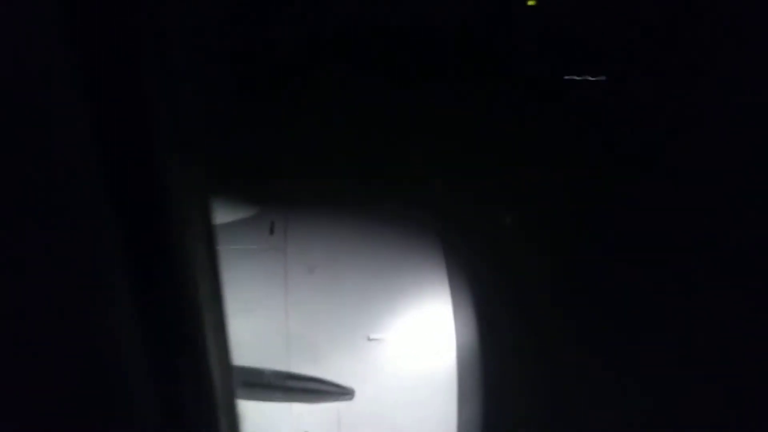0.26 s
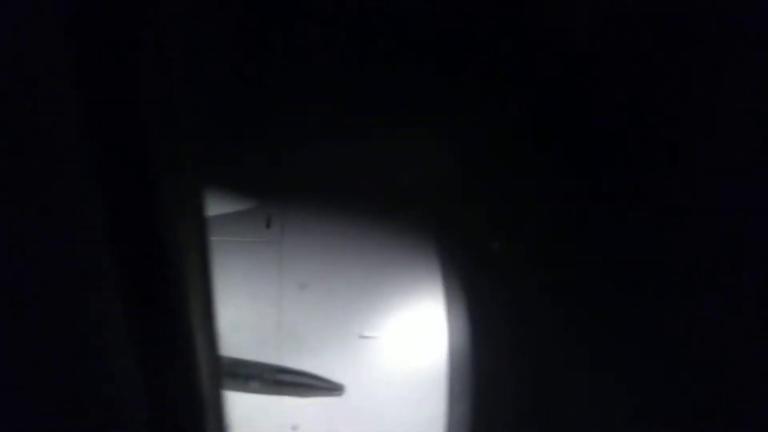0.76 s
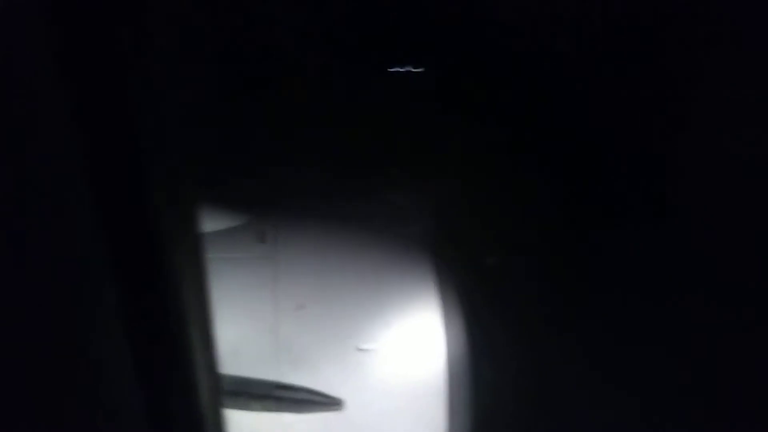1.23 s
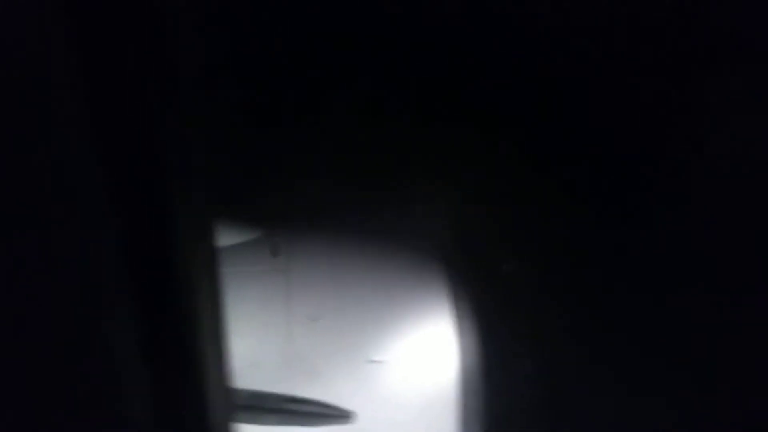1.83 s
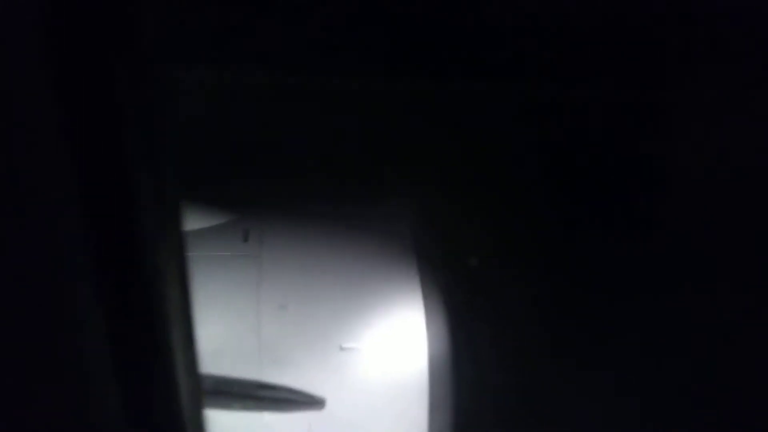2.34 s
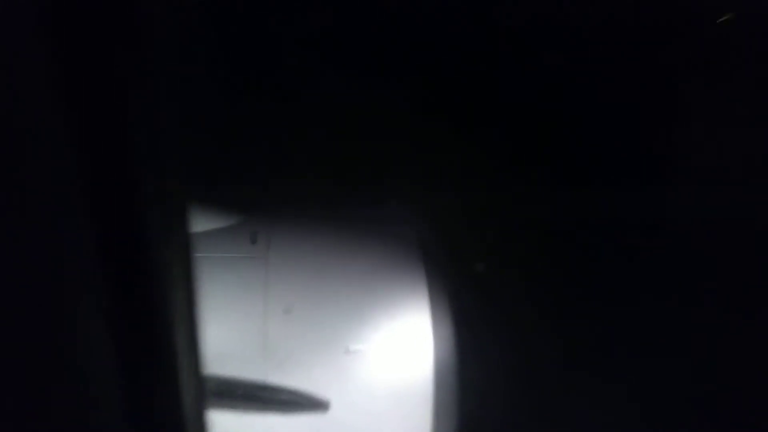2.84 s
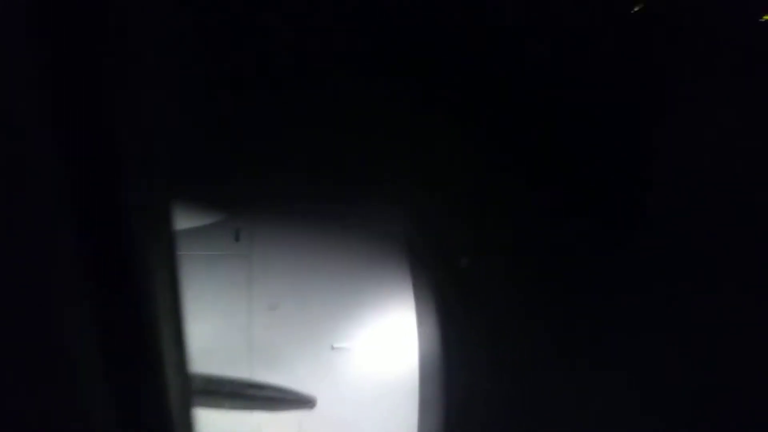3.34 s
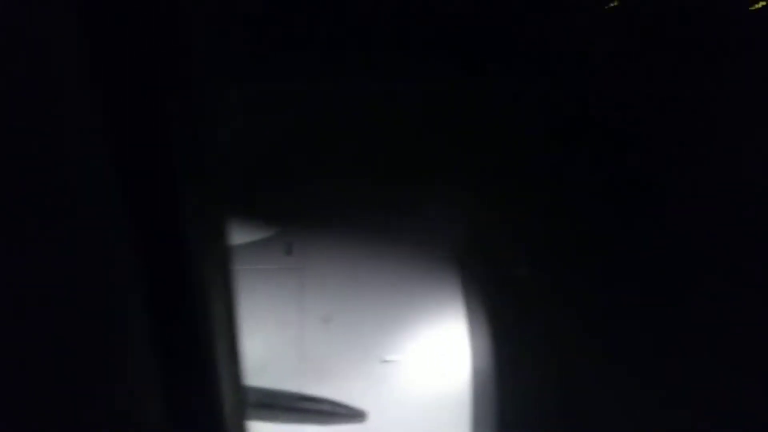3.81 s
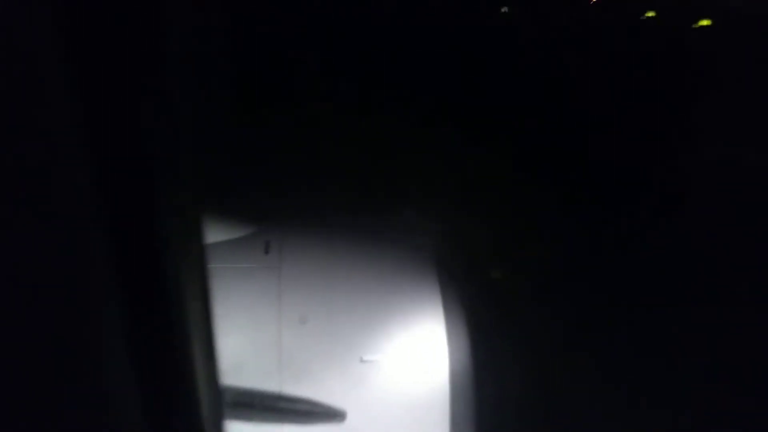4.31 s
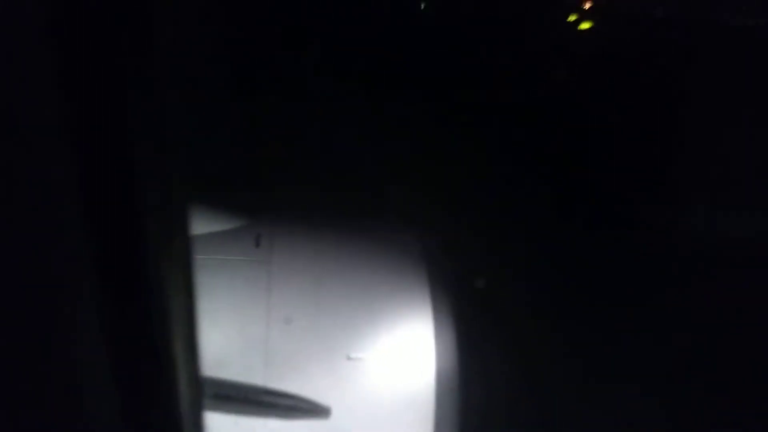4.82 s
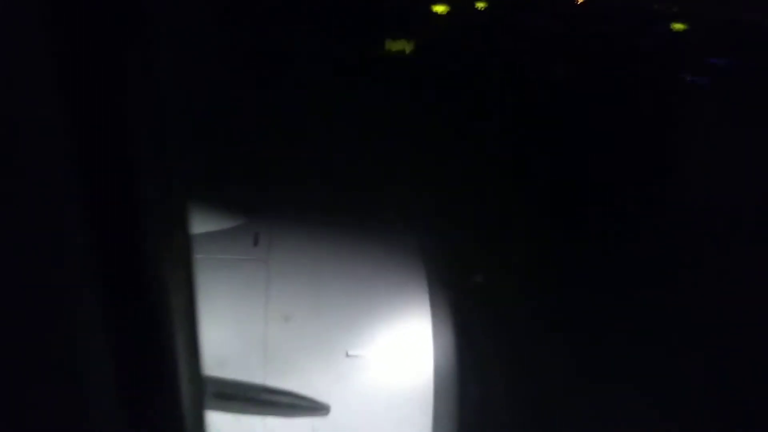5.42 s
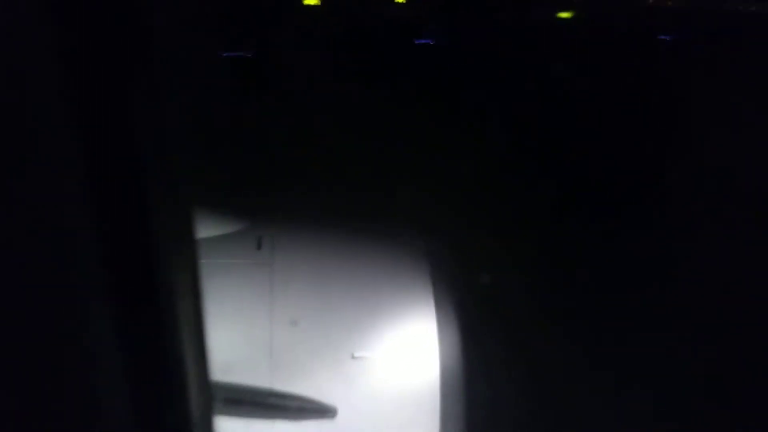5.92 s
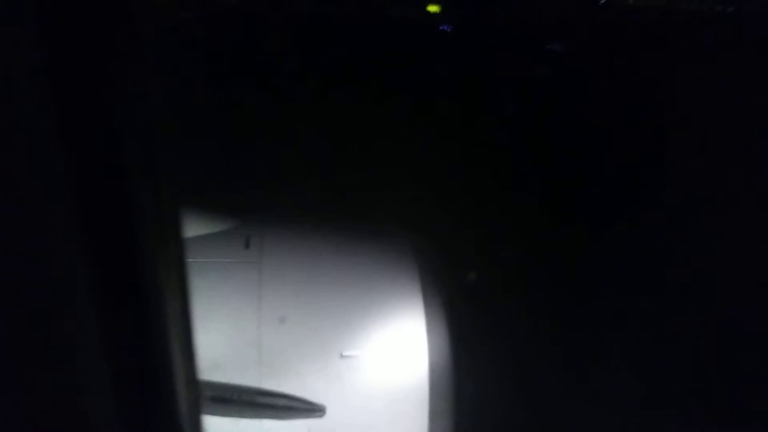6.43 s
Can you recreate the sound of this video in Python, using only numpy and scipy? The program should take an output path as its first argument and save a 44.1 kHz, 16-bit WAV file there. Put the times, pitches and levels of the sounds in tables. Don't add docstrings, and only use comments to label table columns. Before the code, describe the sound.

Seen from a window seat at night, the plane rolls fast on the runway: deep floor rumble, double bump at the start, then engines swelling to a rough, broad blast that stays loud to the end. Bright plastic clicks and raps scatter throughout, growing denser with the shaking. Air hiss sits underneath. The close small microphone clips and stutters under pressure, crackling through the roar.

```python
import sys
import numpy as np
from scipy import signal
from scipy.fft import rfft, irfft, next_fast_len
from scipy.io import wavfile
from scipy.ndimage import uniform_filter1d, minimum_filter1d, map_coordinates

SR = 44100
rng = np.random.default_rng(int(sys.argv[2]) if len(sys.argv) > 2 else 0)


def gain_from_decibels(decibels):
    exponent = np.asarray(decibels, float) / 20
    return 10 ** exponent


def dump(signal):
    limited = np.clip(np.atleast_2d(signal).T, -1, 1)
    pcm = np.round(limited * 32767).astype(np.int16)
    wavfile.write(sys.argv[1], SR, pcm)


N = 293706

# time_s, level_db
THRUST = [(0, -13), (.3, -12), (.8, -10), (1.1, -8), (1.6, -6.5), (1.85, -3.5), (2.1, -5), (2.4, -1),
          (3.0, 0), (3.6, 1), (4.1, 0.5), (4.7, 0.5), (5.3, 0), (6.0, 0), (6.66, 1)]


def unit(x):
    return x / np.sqrt(np.mean(x ** 2) + 1e-20)


def curves(rows):
    s, *cols = np.transpose(rows)
    return [np.interp(np.arange(N) / SR, s, c) for c in cols]


def filtered(x, response):
    m = next_fast_len(N + SR // 2)
    return irfft(rfft(x, m) * response(np.fft.rfftfreq(m, 1 / SR)), m)[:N]


def rush(spectrum, patchy_db, spiky_db=0, patch=(6, 8)):
    shocks = rng.standard_normal(N) * gain_from_decibels(spiky_db * rng.standard_normal(N))
    z = signal.stft(shocks, nperseg=512)[2]
    field = uniform_filter1d(rng.standard_normal(z.shape), size=patch[0], axis=0)
    field = uniform_filter1d(field, size=patch[1], axis=1)
    noise = signal.istft(z * gain_from_decibels(patchy_db * unit(field)), nperseg=512)[1][:N]
    f, db = np.transpose(spectrum)
    return unit(filtered(noise, lambda hz: gain_from_decibels(np.interp(np.log(hz + 1), np.log(f), db, -120, -120))))


def ringing(x, modes):
    def response(f):
        return sum((-1) ** k * gain_from_decibels(db) * 1j * f * width / (centre ** 2 - f * f + 1j * f * width)
                   for k, (centre, width, db) in enumerate(modes))
    return filtered(x, response)


def evened(x, span_s):
    power = np.abs(uniform_filter1d(x ** 2, size=round(span_s * SR)))
    return unit(x / np.sqrt(power + 0.094))


def wobble(rate):
    knots = rng.standard_normal(int(N * rate / SR) + 4)
    return map_coordinates(knots, [np.arange(N) * rate / SR])


def heave():
    # time_s, level_db
    surge = [
        (0, -40),
        (1.3, -36),
        (2.3, -19),
        (6.66, -19),
    ]
    # pitch_hz, density_db (per Hz)
    heave_spectrum = [(5, -38.5), (10, -1.5), (40, -5.5), (60, -8), (80, -45.5)]
    return gain_from_decibels(curves(surge)[0]) * rush(heave_spectrum, patchy_db=-0.4)


def wheels():
    # time_s, level_db
    roll = [(0, -15.5), (.13, -14), (.3, -22), (.55, -16), (.8, -14), (1.05, -15), (1.1, -19), (1.2, -15),
            (1.6, -16.5), (2.0, -14.5), (2.3, -11.5), (3.5, -9.5), (4.15, -13), (4.4, -9), (4.6, -12),
            (4.75, -9), (4.9, -10.5), (6.66, -10.5)]
    # pitch_hz, density_db (per Hz)
    rumble_spectrum = [(35, -40.5), (55, 5.5), (80, -2.5), (125, -2), (160, -7), (200, -21.5), (300, -60.5)]
    level_db = curves(roll)[0] + 5.0 + 1.2 * wobble(12)
    return gain_from_decibels(level_db) * evened(rush(rumble_spectrum, patchy_db=-1.07), span_s=0.12)


def jolts():
    # time_s, swell_db
    bumps = [(0, 11), (.13, 14), (2.15, 3.5), (2.3, 3.5), (2.43, 4), (3.93, 1), (4.19, 7), (4.6, 1),
             (4.71, 4), (5.25, 6.5), (6.16, 3.5)]
    t, width_s = np.arange(N) / SR, 0.017
    return sum(db * np.exp(-((t - s) / width_s) ** 2) for s, db in bumps)


def engines():
    # pitch_hz, density_db (per Hz)
    roar_spectrum = [(120, -42), (170, -2.5), (225, 0.5), (255, -7.5), (310, -4), (370, -15), (480, -22),
                     (800, -48.5)]
    blast_spectrum = [(250, -48), (420, -4), (700, -5.5), (1100, -15), (1700, -24), (2400, -44.5),
                      (4000, -68)]
    thrust_db, bump_db = curves(THRUST)[0], jolts()
    roar_db = thrust_db - 11.5 + 0.3 * bump_db + 1.14 * wobble(12)
    roar = gain_from_decibels(roar_db) * evened(rush(roar_spectrum, patchy_db=-0.45), span_s=0.087)
    blast_db = 1.32 * thrust_db - 31 + bump_db + 1.63 * wobble(35)
    blast = gain_from_decibels(blast_db) * rush(blast_spectrum, patchy_db=1.5, spiky_db=9.0, patch=(14, 4))
    return roar + blast


def vents():
    # pitch_hz, density_db (per Hz)
    hiss_spectrum = [(600, -35), (1200, -3.5), (1750, -8), (2150, -2), (2600, -8.5), (3400, -11.5),
                     (4100, -16), (4800, -7.5), (5300, -7), (6000, -18.5), (7000, -28), (9000, -58.5)]
    return gain_from_decibels(0.43 * curves(THRUST)[0] - 41) * rush(hiss_spectrum, patchy_db=0.86)


def trim():
    # pitch_hz, density_db (per Hz)
    sizzle_spectrum = [(1000, -28), (1500, 9), (3000, 5.5), (4200, 1.5), (6000, 0), (8000, -2.5),
                       (10000, -9.5), (11200, -21.5), (12500, -45)]
    shimmer_spectrum = [(10500, -27), (11500, 2), (12700, -0.5), (13300, -16.5), (14700, -10.5),
                        (15300, 2.5), (15800, -4)]
    buzz_s, nose_down_s, nose_db = 0.22, 1.4, 4
    thrust_db, t = curves(THRUST)[0], np.arange(N) / SR
    touchdown_db = 11 * np.exp(-(t / buzz_s) ** 2)
    shaken_db = touchdown_db - nose_db * np.clip((nose_down_s - t) / 0.5, 0, 1)
    sizzle = rush(sizzle_spectrum, patchy_db=1.5, spiky_db=3.0, patch=(30, 2))
    shimmer = rush(shimmer_spectrum, patchy_db=5.5, spiky_db=-1.0, patch=(14, 5))
    sizzle_db = thrust_db - 43.0 + shaken_db
    shimmer_db = 1.4 * thrust_db - 65.5 + 0.6 * shaken_db
    return gain_from_decibels(sizzle_db) * sizzle + gain_from_decibels(shimmer_db) * shimmer


def jitter(count):
    when, size, bright = rng.random((count, 3)).T
    return np.transpose([1.4 + when * (N / SR - 1.5), -39 - 5.0 * np.log(size + 0.08), -21 + 7 * bright])


def panel():
    # start_s, peak_db, bright_db
    slaps = [(.0985, -26.5, -26), (1.02, -22.5, -17), (1.334, -20.5, -15.5), (1.3857, -23, -21),
             (1.696, -22.5, -17), (1.7521, -25, -19), (2.0288, -22.5, -13), (2.2443, -24.5, -22.5),
             (2.6418, -14, -22.5), (2.7878, -23, -15), (2.8388, -23, -18), (2.9382, -17.5, -17.5),
             (3.0418, -20, -16.5), (3.1472, -22, -21), (3.397, -20.5, -16), (3.5576, -24, -16),
             (3.7073, -22.5, -25), (3.763, -22, -26), (3.8173, -21, -17), (3.917, -23.5, -18.5),
             (3.9454, -20.5, -19.5), (4.0038, -25.5, -17), (4.0728, -18.5, -16), (4.143, -23, -20),
             (4.6027, -20, -19.5), (4.655, -23.5, -18), (4.8565, -20.5, -13), (5.029, -18.5, -23),
             (5.3339, -19, -17), (5.5546, -22, -20.5)]
    # start_s, peak_db
    clicks = [(.096, -33), (.189, -29.5), (0.232, -33), (.7503, -31.5), (.807, -31), (1.1403, -30),
              (1.1952, -28), (1.6444, -27.5), (1.8157, -24.5), (1.9827, -31.5), (2.2937, -30), (2.335, -34),
              (2.4728, -29), (2.686, -27), (2.8902, -27.5), (3.192, -26.5), (3.2498, -29.5), (3.447, -30),
              (4.193, -24), (4.31, -25.5), (4.4069, -26), (4.624, -26), (5.3936, -27.5), (5.606, -24),
              (5.9087, -24.5), (6.0006, -20), (6.0803, -25.5), (6.1443, -24.5), (6.273, -26.5),
              (6.576, -23.5)]
    # start_s, peak_db
    taps = [(0.039, -31.5), (.1, -32), (.9515, -27.5), (1.4505, -32.5), (1.504, -31), (1.524, -31),
            (1.735, -32), (1.798, -28.5), (1.8447, -31), (1.8756, -27), (3.0754, -28), (3.2745, -29),
            (3.603, -29.5), (3.8691, -30.5), (3.9705, -26.5), (4.7267, -27), (4.8437, -31), (4.9408, -30.5),
            (4.999, -27.5), (5.423, -30), (5.693, -31.5), (5.8703, -31), (6.027, -25), (6.3226, -28.5),
            (6.3853, -28), (6.4722, -27), (6.4925, -29), (6.5264, -30), (6.6173, -26), (6.642, -28.5)]
    # pitch_hz, width_hz, level_db
    panel_modes = [(4574, 590, 2), (5110, 390, 5.5), (6290, 520, -6.5)]
    clasp_modes = [(7140, 1070, 3.5), (8880, 1100, 2.5), (9900, 1500, -2)]
    frame_modes = [(2180, 750, 4.5), (3200, 1000, 1)]
    click_bright_db, tap_bright_db = -14.5, -17.5
    t = np.arange(SR // 20) / SR
    chatter_decay = gain_from_decibels(-60 * t / 0.027) + 0.077 * gain_from_decibels(-60 * t / 0.13)
    contact_decay, frame_decay = gain_from_decibels(-60 * t / 0.013), gain_from_decibels(-60 * t / 0.033)
    chatter, contact, frame = np.zeros((3, N + SR))
    rows = [*slaps]
    rows += [(s, db, click_bright_db) for s, db in clicks]
    rows += [(s, db, tap_bright_db) for s, db in taps]
    rows += [*jitter(count=180)]
    for (s, db, bright_db), noise in zip(rows, rng.standard_normal((len(rows), 3, len(t)))):
        at = round(s * SR)
        hit = slice(at, at + len(t))
        chatter[hit] += gain_from_decibels(db + 3.5) * chatter_decay * noise[0]
        contact[hit] += gain_from_decibels(db + bright_db + 12.5) * contact_decay * noise[1]
        frame_db = db - 14.5 - 0.55 * (db + 26.5) + 6.0
        frame[hit] += gain_from_decibels(frame_db) * frame_decay * noise[2]
    ticks = ringing(chatter[:N], panel_modes) + ringing(contact[:N], clasp_modes) + ringing(frame[:N], frame_modes)
    return filtered(ticks, lambda hz: 0.12 + 0.86 / np.sqrt(1 + (hz / 10900) ** 16))


def cloth():
    # time_s, level_db
    rustle = [
        (.44, -91),
        (.54, -52.5),
        (.63, -56.5),
        (.72, -71),
        (.93, -84),
        (1.02, -56),
        (1.13, -56),
        (1.17, -68),
        (1.32, -77),
    ]
    # pitch_hz, density_db (per Hz)
    cloth_spectrum = [(5800, -44.5), (6500, -1), (7200, 2), (8000, -4.5), (8600, -27.5), (10000, -56.5)]
    return gain_from_decibels(curves(rustle)[0]) * rush(cloth_spectrum, patchy_db=-1.5)


def scene():
    return (heave() + wheels() + engines() + vents() + panel() + cloth() + trim())[None]


def capsule(x, leak, count):
    # start_s, length_ms
    stalls = [(.1045, 4.1), (.1257, 3.9), (.1297, 3.9), (.1342, 5), (1.6102, 3.2), (1.6553, 5.4),
              (1.725, 4.6), (1.7314, 4.7), (1.7447, 6.2), (1.7832, 10), (1.8181, 5.4), (1.8332, 6.5),
              (1.866, 4.9), (1.952, 6.3), (2.5402, 4.8), (2.593, 7.9), (2.609, 4), (3.0216, 8.4),
              (3.4536, 4.7), (3.6126, 4.8), (4.593, 4), (4.6161, 4.6), (4.6323, 5.7), (4.9001, 6),
              (4.9688, 4.6), (5.8182, 3.6), (6.3096, 4.5), (6.3284, 4.3), (6.465, 4.2), (6.5643, 3.9)]
    stop = 1.05
    when, length = rng.random((count, 2)).T
    grazes = np.transpose([2.1 + when * (N / SR - 2.2), 0.5 + 2.6 * length ** 3])
    free = np.ones(N)
    for s, ms in [*stalls, *grazes]:
        free[round(s * SR):round((s + ms / 1000) * SR)] = 0
    motion = np.diff(np.clip(x, -stop, stop), prepend=0)
    held = np.cumsum(motion * free)
    return held + leak * (x - held)


def snaps(count):
    # start_s, peak_db
    cracks = [(.111, -20.5), (.128, -19), (1.301, -22), (1.707, -21), (1.792, -17.5), (1.928, -20),
              (2.105, -14), (2.596, -13.5), (2.547, -20), (2.993, -10.5), (3.246, -11), (3.393, -11),
              (3.414, -8.5), (3.48, -8.5), (3.638, -13), (4.164, -14), (4.223, -12), (4.319, -11.5),
              (4.685, -16), (4.936, -10), (5.199, -12.5), (5.249, -10), (5.824, -15), (6.111, -11.5),
              (6.144, -11), (6.183, -14), (4.91, -12.5), (6.39, -13), (6.566, -19), (6.633, -11)]
    u = np.arange(SR // 50) / SR / 0.00029
    lurch = u ** 2 * np.exp(-u)
    blows = np.zeros(N)
    when, size = rng.random((count, 2)).T
    rows = [*cracks, *zip(2.1 + when * (N / SR - 2.2), -17 - 14 * size)]
    for (s, db), side in zip(rows, rng.choice([-1, 1], size=len(rows))):
        blows[round(s * SR)] = side * gain_from_decibels(db + 12.0)
    return signal.fftconvolve(blows, lurch)[:N]


def limiter(x, top, hold_s, knee):
    size = round(hold_s * SR)
    need = np.minimum(1, top / (np.abs(x) + 1e-9))
    x = x * uniform_filter1d(minimum_filter1d(need, size=size), size=size)
    return x / (1 + np.abs(x / (1.37 * top)) ** knee) ** (1 / knee)


def case_shake():
    # pitch_hz, density_db (per Hz)
    case_spectrum = [(12, -45), (22, 3), (35, 0.5), (45, -1), (65, -30.5)]
    return gain_from_decibels(-37) * rush(case_spectrum, patchy_db=0.3)


def top_cut(x):
    return signal.sosfilt(signal.butter(12, 17010, fs=SR, output="sos"), x)


def record(dry):
    bass_cut_hz, top_hz = 90, 15900
    cut = signal.butter(4, bass_cut_hz, "high", fs=SR, output="sos")
    x = capsule(dry[0], leak=0.032, count=195) + snaps(count=32)
    x = limiter(signal.sosfilt(cut, x), top=0.83, hold_s=0.0078, knee=15.0)
    x = filtered(x + case_shake(), lambda hz: hz < top_hz)
    x = x * np.clip((N - np.arange(N)) / (0.002 * SR) + 0.15, 0, 1)
    return top_cut(x[None])


dry = scene()
out = record(dry)
dump(out)
```